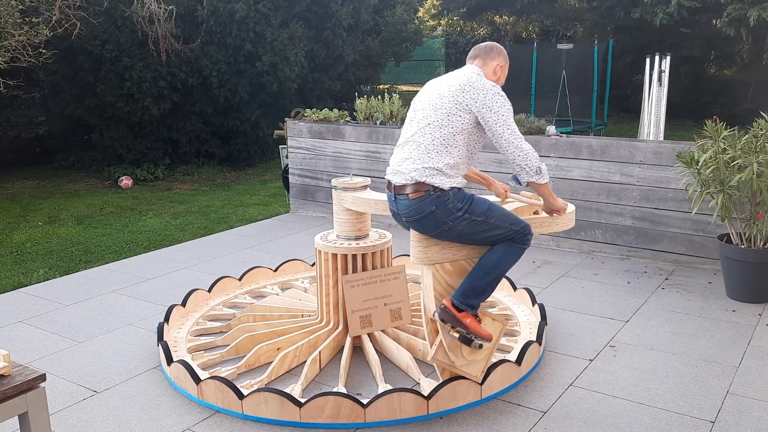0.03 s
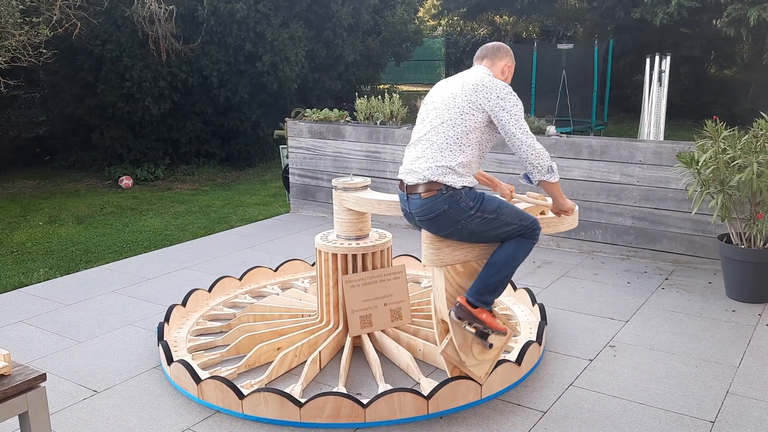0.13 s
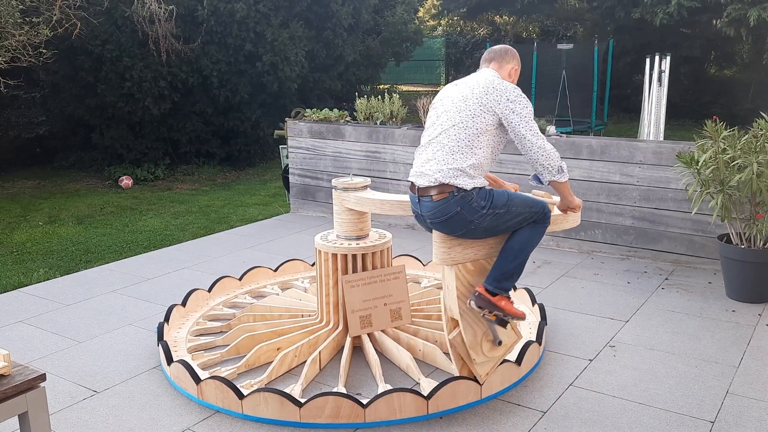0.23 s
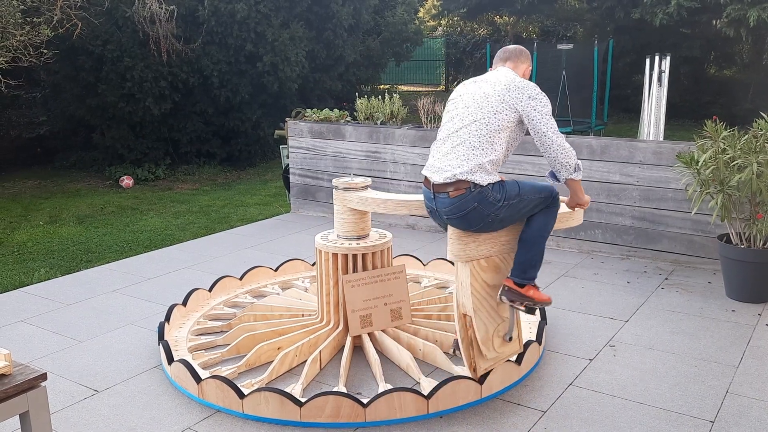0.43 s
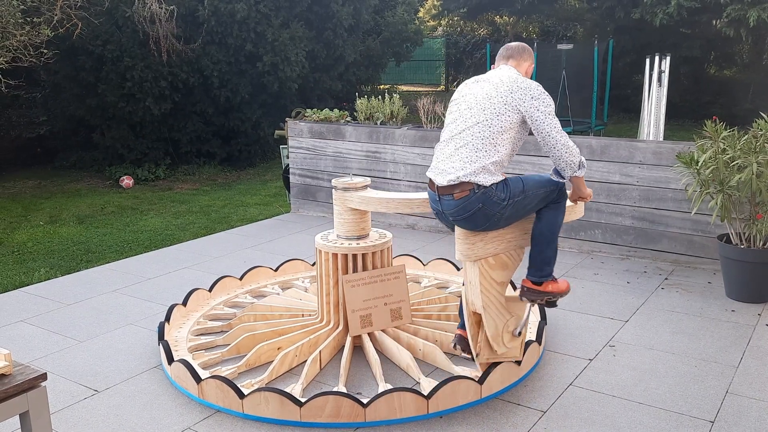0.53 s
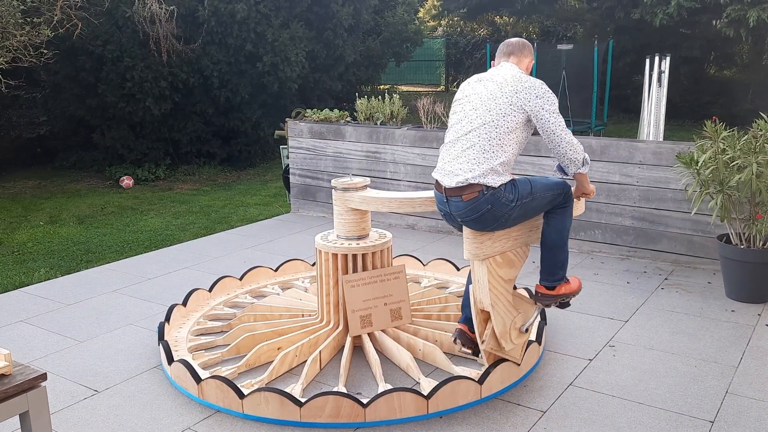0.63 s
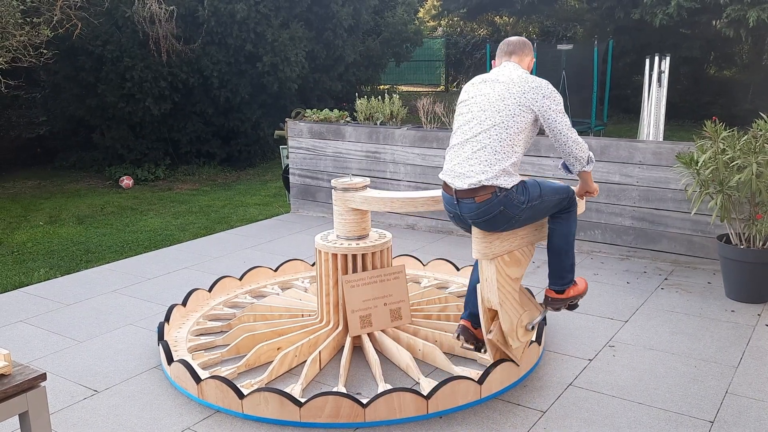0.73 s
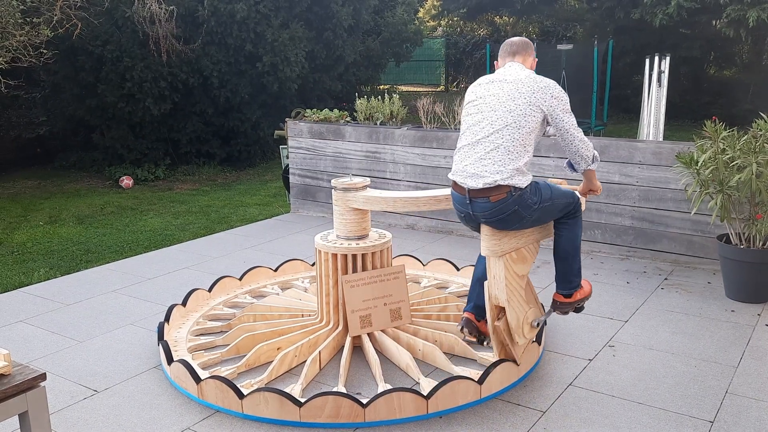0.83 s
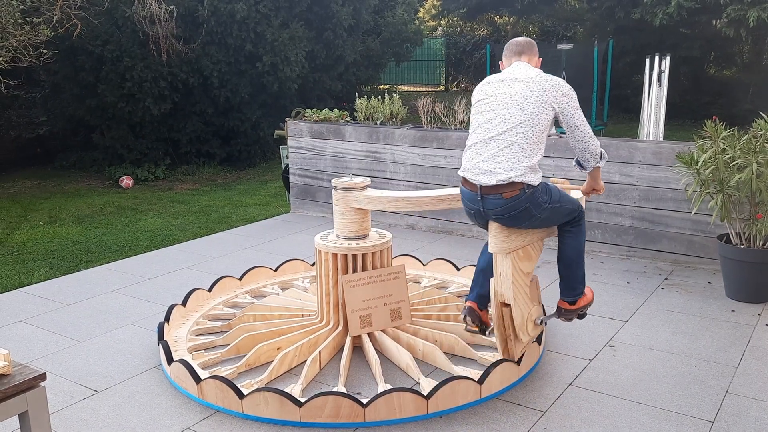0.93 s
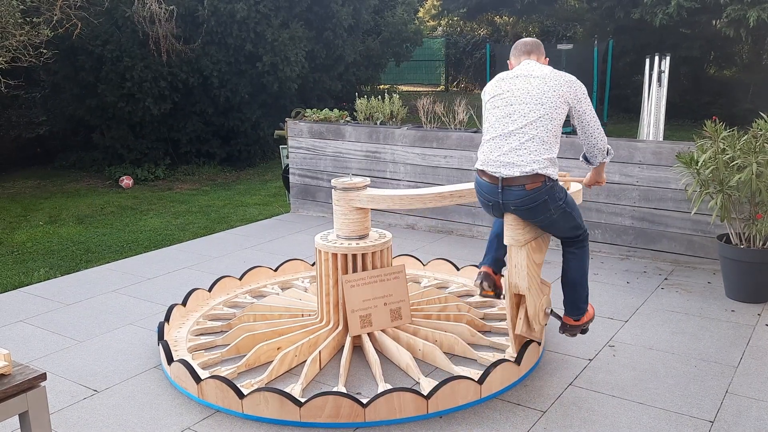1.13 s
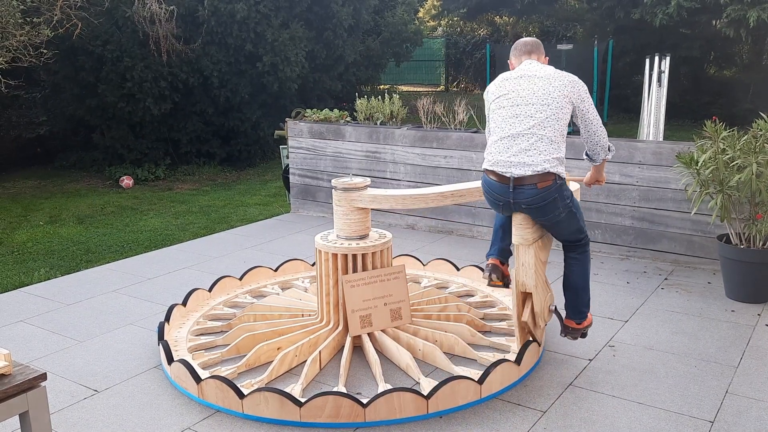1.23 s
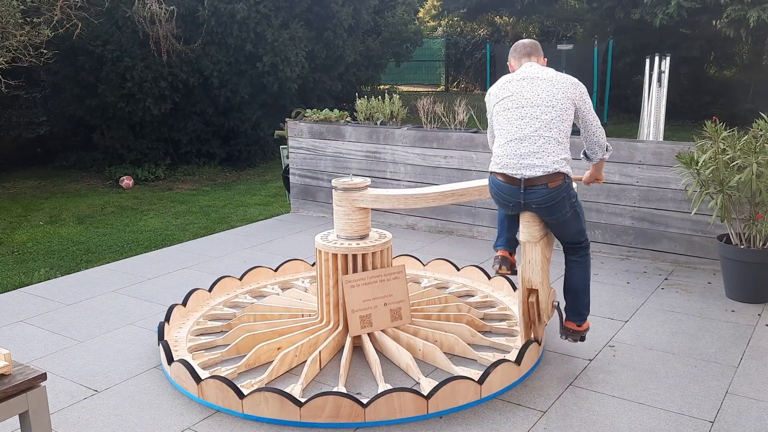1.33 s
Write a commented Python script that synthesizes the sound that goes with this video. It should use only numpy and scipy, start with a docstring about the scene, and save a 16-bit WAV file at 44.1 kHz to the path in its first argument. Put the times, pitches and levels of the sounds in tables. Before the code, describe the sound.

A wooden pedal bike's dry joint gives two quick, high, raspy squeaks on the right as its wheel knocks over slats. Softer knocks, ticks and faint rolling follow, over a quiet outdoor background.

```python
"""A wooden pedal bike rolls round its slatted wooden track on a garden terrace.
A dry joint squeals in two swings, jumping from mode to mode and rasping as it lets go, while the wheel knocks over the slats.
Paving and a plank wall give the squeal a short tail, over a quiet outdoor background."""
import sys
import numpy as np
from scipy import signal
from scipy.fft import rfft, irfft
from scipy.io import wavfile

SR = 44100
rng = np.random.default_rng(int(sys.argv[2]) if len(sys.argv) > 2 else 0)


def generate_wav(sig):
    """Save sig (samples, or channels by samples) to the path in sys.argv[1] as 16-bit PCM at SR."""
    pcm = np.round(np.clip(np.atleast_2d(sig).T, -1, 1) * 32767).astype(np.int16)
    wavfile.write(sys.argv[1], SR, pcm)


N = 61739

# one row for each mode that the joint locks on to
# (start s, length s, first Hz, middle Hz, last Hz, level dB, swell over the note dB, octave overtone dB, roughness 0-1)
SQUEALS = [
    (.061, .027, 15480, 14760, 14450, -31, 0, -40, .2),  # fixed
    (.092, .028, 9600, 9170, 8950, -32, -5, -30, .15),  # fixed
    (.112, .011, 7150, 7060, 7000, -32, 0, -16, .4),
    (.113, .007, 11550, 11450, 11350, -34, 0, -30, .6),
    (.119, .040, 8230, 7970, 7660, -24, -2, -12, .1),  # fixed
    (.156, .026, 6365, 6362, 6378, -13.5, 1, -9, .03),  # fixed
    (.181, .013, 6450, 6930, 7200, -16.5, 0, -8, .18),  # fixed
    (.199, .026, 9300, 9790, 9900, -25, -4, -30, .25),  # fixed
    (.241, .031, 9820, 9580, 9460, -26, 10, -30, .15),  # fixed
    (.271, .033, 9520, 9900, 10000, -26, -13, -30, .2),  # fixed
    (.324, .021, 9780, 9580, 9000, -23.5, -2, -30, .22),  # fixed
    (.338, .016, 4500, 4600, 4850, -38, 7, -20, .6),
    (.344, .010, 7850, 7740, 7480, -17.5, 0, -9, .28),  # fixed
    (.353, .038, 6940, 6895, 6985, -17, -7, -3, .035),  # fixed
    (.391, .043, 7690, 8010, 8170, -16.5, -9, -12, .06),  # fixed
    (.426, .056, 9530, 9715, 9930, -26, 7, -30, .04)]  # fixed
ATTACK_S, RELEASE_S = 0.0036, 0.002
JITTER_HZ, JITTER_PER_S, FLUTTER_DB = 554, 1200, 1.5
JOINT_PAN_DB = -20.5  # left minus right
# the joint slips and scrapes without ringing: (start s, length s, level dB)
RASPS = [(.156, .006, -37), (.188, .022, -35), (.232, .012, -38), (.250, .030, -46), (.281, .007, -35), (.292, .014, -49),  # fixed
         (.3255, .004, -34), (.336, .008, -42), (.345, .009, -30), (.428, .004, -37)]  # fixed
RASP_COLOUR = [(1000, -25), (3000, -27), (4000, -14.5), (4600, -13.5), (5600, -18.5), (7200, -4.5), (8200, 7), (8750, -10), (9400, -1.5), (10600, -12.5), (12500, 0.5), (15500, -9)]  # (Hz, dB)
SLIPS_PER_S, SLIP_SPREAD_DB, RASP_RELEASE_S = 1200, 5.5, .006
# the wheel meets a slat: (s, peak dB, pitch Hz, t60 s)
KNOCKS = [(.221, -27, 133.8, 0.076), (0.2271, -26, 345, 0.045), (.239, -23, 118.7, .08), (.263, -33.5, 301, 0.1), (.288, -31.5, 320, 0.048),
          (0.298, -30.5, 190, .08), (0.311, -35.5, 222.7, 0.019), (0.372, -44.5, 290, 0.13), (.392, -46, 584, 0.063), (0.464, -48.5, 1287, 0.082), (0.541, -45.5, 303, 0.1), (0.839, -37, 320, 0.08),
          (0.8891, -27.5, 252.3, 0.055), (0.902, -37, 108.4, 0.066), (.915, -42.5, 278, 0.083), (1.044, -43.5, 362, 0.15), (1.062, -37.5, 372.4, 0.09), (1.079, -41, 136, 0.083), (1.097, -38.5, 317, 0.048), (1.24, -48.5, 180, .08)]
SLAT_MODES = [(1, 0.5, 0.94), (1.42, -17, 0.47), (2.1, -13, .8), (2.7, -10.5, .6), (3.8, -17.5, 0.4), (4.5, -24, 0.46)]  # (pitch ratio, dB, share of the t60)
CONTACT_S, CRACK_DB, CRACK_S, KNOCK_LAG_S = 0.0011, -10.5, .007, 0.00024
CRACK_COLOUR = [(150, 14.5), (400, 8.5), (700, 3), (1150, -2.5), (1600, -12), (5000, -30)]  # (Hz, dB)
# wheel rolling on wood: (s, dB)
ROLL = [(0, -58), (.1, -60), (.2, -53.5), (0.231, -43), (.25, -47.5), (.32, -48), (.43, -53.5), (0.468, -52), (.5, -58), (.55, -60), (.6, -63), (.77, -74.5), (.86, -59.5), (.99, -63.5), (1.06, -57), (1.116, -59), (1.161, -65.5), (1.4, -59.5)]
ROLL_COLOUR = [(28, -25.5), (50, 0.5), (80, 12), (160, 0), (350, -2), (500, -5), (1000, -3.5), (2000, -6), (3200, -12), (6000, -14.5), (15000, -33.5)]  # (Hz, dB)
ROLL_DB, ROLL_GRAINS_PER_S, ROLL_SPREAD_DB = 2.5, 1800, 1.5
GARDEN = [(25, -30.5), (84, 3.5), (195, -15.5), (326, -13), (463, -20), (887, -5.5), (1520, -17.5), (2220, -16.5), (3250, -37.5), (6210, -21.5), (9570, -40), (12500, -22), (16000, -37)]  # (Hz, dB)
GARDEN_DB = -59.5
RUMBLE, RUMBLE_DB = [(28, -43.5), (42, -6), (54, 7), (85, -3), (130, -5.5), (250, -45)], -58.5  # (Hz, dB)
LIKENESS = [(100, 0.94), (300, 0.77), (600, .1), (1500, 0), (16000, 0)]  # (Hz, correlation of left and right)
AIR_PAN = [(100, 0), (1500, 2), (2500, 0), (4400, -5), (8000, -14.5), (15000, -23.5)]  # (Hz, left minus right dB)
EARLY_T60_S, EARLY_DB, EARLY_DELAY_S = 0.086, -8, 0.0052
TOP_HZ = 15800  # fixed
# loose wooden parts clack and tick: (s, level dB, decay s)
TICKS = [(0.2278, -26.5, 0.0031), (.286, -39.5, 0.0077), (.463, -65, 0.0044), (.546, -78, 0.0027), (.832, -51.5, 0.0083), (.875, -57.5, 0.0075), (1.004, -52.5, 0.0096),
         (1.064, -57.5, 0.0081), (1.122, -65, 0.0035), (1.223, -56.5, 0.015), (1.348, -57, 0.0086), (1.381, -54, 0.014)]
TICK_COLOUR = [(600, -11), (1400, -15.5), (2000, 6.5), (2900, -10.5), (3800, 2), (4600, -4.5), (5500, 5.5), (8000, -8.5), (10500, -20), (13000, -4.5), (16000, -9.5)]  # (Hz, dB)
TAIL_T60_S = .24  # fixed
TAIL_DB, TAIL_PAN_DB, TAIL_DELAY_S = -12.5, -15.5, 0.01
SQUEAL_DB = -.3
RASP_DB = 3.5
EARLY_PAN_DB = -14
LOW_CUT_HZ = 52


def undb(db):
    return 10 ** (np.asarray(db) / 20)


def unit(x):
    """Scale to rms 1."""
    return x / np.sqrt(np.mean(x ** 2))


def along_hz(points):
    """Read (Hz, value) points at every frequency bin."""
    hz, value = np.array(points, float).T
    return np.interp(np.log(np.arange(N // 2 + 1) * SR / N + 1), np.log(hz), value)


def colour(x, points):
    """Give a sound the spectrum of (Hz, dB) points, at rms 1."""
    return unit(irfft(rfft(x) * undb(along_hz(points)), N))


def walk(rate):
    """Smooth chance with a spread of 1."""
    return unit(signal.sosfilt(signal.butter(4, rate / 2, fs=SR, output="sos"), rng.standard_normal(N)))  # fixed


def grains(rate, spread_db):
    """Random tiny clicks of uneven size."""
    return (rng.random(N) < rate / SR) * undb(spread_db * rng.standard_normal(N)) * rng.choice([-1, 1], N)


def gate(age, length, attack, release):
    """Attack, hold, release."""
    return np.sin(np.clip(age / attack, 0, 1) * np.pi / 2) ** 2 * np.exp(-np.maximum(age - length, 0) / release)


def spread(a, b, points):
    """Two unrelated sounds as a wide one: bass alike on both sides, treble leaning right."""
    alike = np.clip(along_hz(LIKENESS), -1, 1)
    mid, side = rfft(a) * np.sqrt(1 + alike), rfft(b) * np.sqrt(1 - alike)
    lean = undb(along_hz(AIR_PAN) / 2)
    pair = np.array([(mid + side) * lean, (mid - side) / lean]) / np.hypot(lean, 1 / lean)
    return colour(irfft(pair, N), points)


def squeal(t):
    """Stick-slip tone with its octave; the pitch bends within a mode and shakes when the grip is rough."""
    out = np.zeros(N)
    jitter, flutter = walk(JITTER_PER_S), walk(JITTER_PER_S)
    for start, length, first, middle, last, db, swell_db, octave_db, rough in SQUEALS:
        u = np.clip((t - start) / length, 0, 1)
        hz = first + (last - first) * u + (2 * middle - first - last) * 2 * u * (1 - u)
        phase = 2 * np.pi * np.cumsum((hz + rough * JITTER_HZ * jitter) * (t > start)) / SR
        tone = np.sin(phase) + undb(octave_db) * np.sin(2 * phase) * (2 * hz < SR / 2)
        out += np.sqrt(2) * tone * gate(t - start, length, ATTACK_S, RELEASE_S) * undb(db + swell_db * (u - .5) + rough * FLUTTER_DB * flutter)
    return out


def rasp(t):
    """Bursts of irregular slips in the same joint."""
    push = sum(undb(db) * gate(t - start, length, ATTACK_S / 10, RASP_RELEASE_S) for start, length, db in RASPS)
    return push * colour(grains(SLIPS_PER_S, SLIP_SPREAD_DB), RASP_COLOUR)


def knocks(t):
    """Each slat rings briefly at its own pitch, with a dull crack of contact."""
    ring, contact = np.zeros(N), np.zeros(N)
    for start, db, hz, t60 in KNOCKS:
        age = np.maximum(t - start, 0)
        blow = undb(db) * (1 - np.exp(-age / CONTACT_S))
        contact += blow * np.exp(-age / CRACK_S)
        for ratio, mode_db, share in SLAT_MODES:
            ring += blow * undb(mode_db) * np.sin(2 * np.pi * hz * ratio * age) * np.exp(-np.log(1000) * age / (t60 * share))
    crack = undb(CRACK_DB) * contact * spread(*rng.standard_normal((2, N)), CRACK_COLOUR)
    return np.array([np.interp(t - KNOCK_LAG_S, t, ring), ring]) + crack


def rolling(t):
    """Grainy rub of the wheel on the track."""
    when, db = np.array(ROLL).T
    grit = [grains(ROLL_GRAINS_PER_S, ROLL_SPREAD_DB) for _ in range(2)]
    return undb(np.interp(t, when, db) + ROLL_DB) * spread(*grit, ROLL_COLOUR)


def garden():
    """Faint outdoor hush over a low rumble."""
    hush = spread(*rng.standard_normal((2, N)), GARDEN)
    return undb(GARDEN_DB) * hush + undb(RUMBLE_DB) * spread(*rng.standard_normal((2, N)), RUMBLE)


def echoes(x, t, delay, t60):
    """Scattered reflections that die away."""
    response = rng.standard_normal((2, N)) * (t > delay) * np.exp(-np.log(1000) * t / t60)
    return signal.fftconvolve(x[None], unit(response) / np.sqrt(N), axes=1)[:, :N]


def ticks(t):
    """Sharp dry clacks of the wooden frame."""
    push = sum(undb(db) * gate(t - start, 0, ATTACK_S / 20, decay) for start, db, decay in TICKS)
    return push * spread(*rng.standard_normal((2, N)), TICK_COLOUR)


def scene():
    """The joint and its reflections lean right; the track and the garden lie in the middle."""
    t = np.arange(N) / SR
    joint = undb(SQUEAL_DB) * squeal(t) + undb(RASP_DB) * rasp(t)
    frame = undb(EARLY_DB) * undb([[EARLY_PAN_DB], [0]]) * echoes(joint, t, EARLY_DELAY_S, EARLY_T60_S)
    terrace = undb(TAIL_DB) * undb([[TAIL_PAN_DB], [0]]) * echoes(joint, t, TAIL_DELAY_S, TAIL_T60_S)
    return joint * undb([[JOINT_PAN_DB], [0]]) + frame + terrace + knocks(t) + ticks(t) + rolling(t) + garden()


def record(dry):
    """The recorder thins the deepest bass and cuts the top."""
    thin = signal.sosfilt(signal.butter(2, LOW_CUT_HZ, "high", fs=SR, output="sos"), dry)
    return signal.sosfilt(signal.ellip(10, .2, 70, TOP_HZ, fs=SR, output="sos"), thin)  # fixed


dry = scene()
out = record(dry)
generate_wav(out)
```